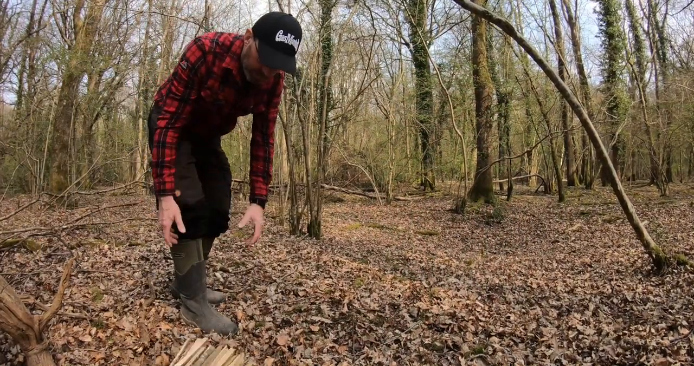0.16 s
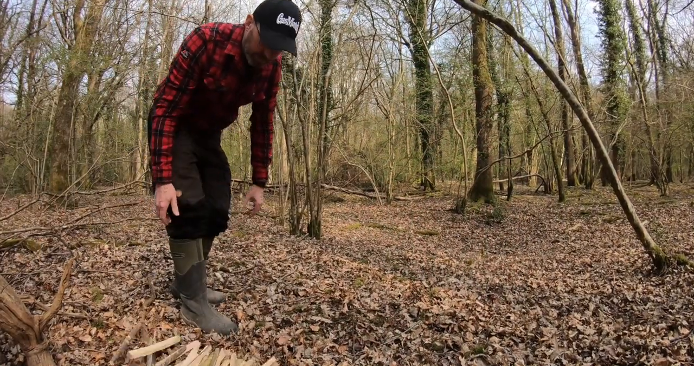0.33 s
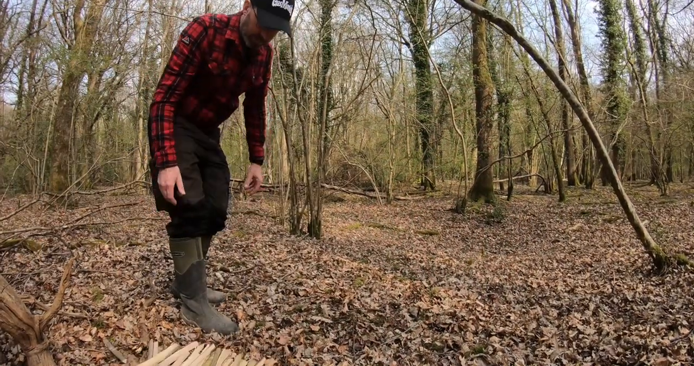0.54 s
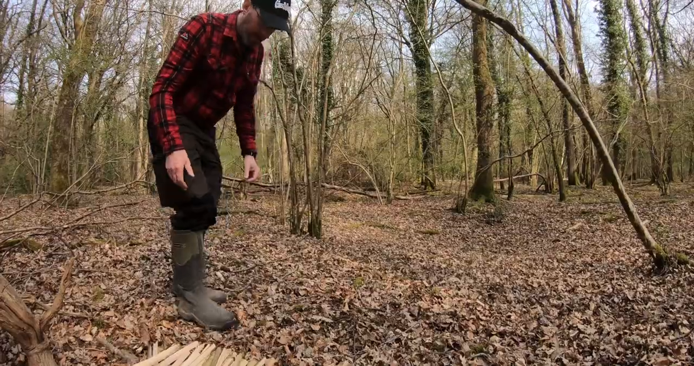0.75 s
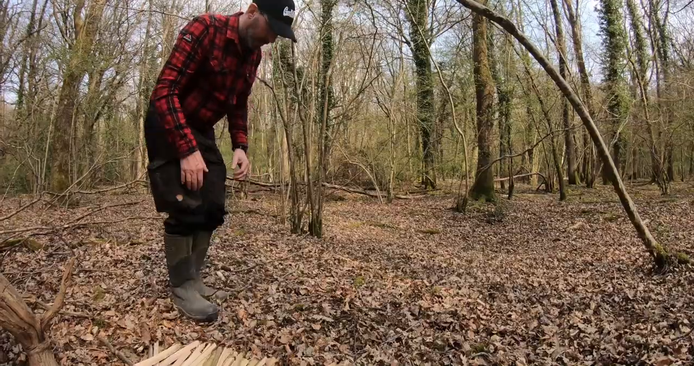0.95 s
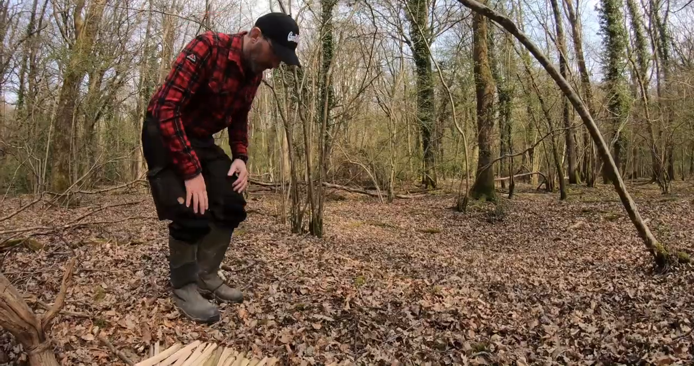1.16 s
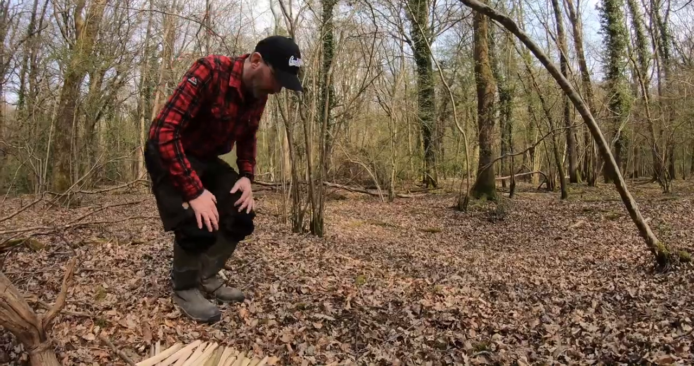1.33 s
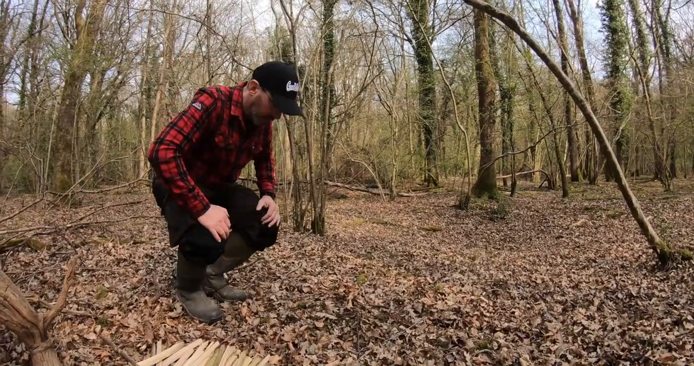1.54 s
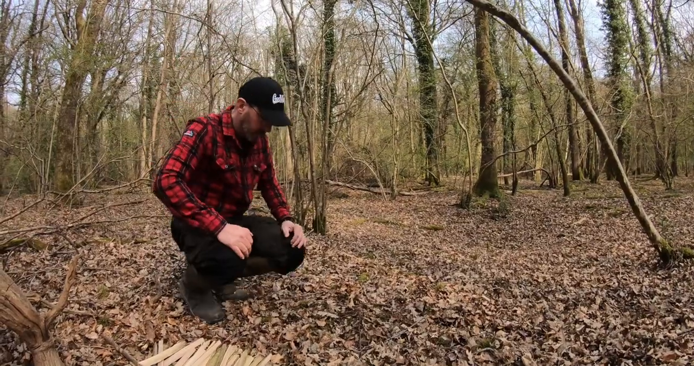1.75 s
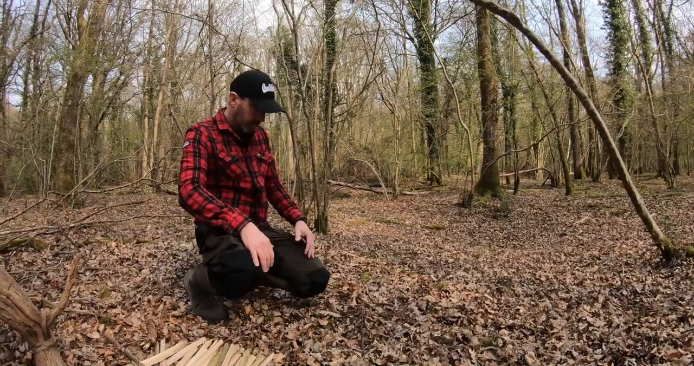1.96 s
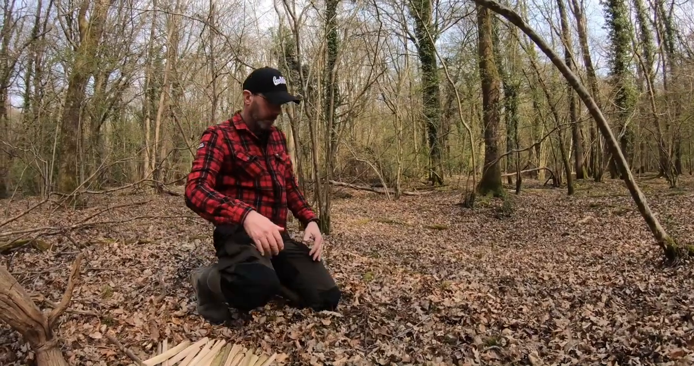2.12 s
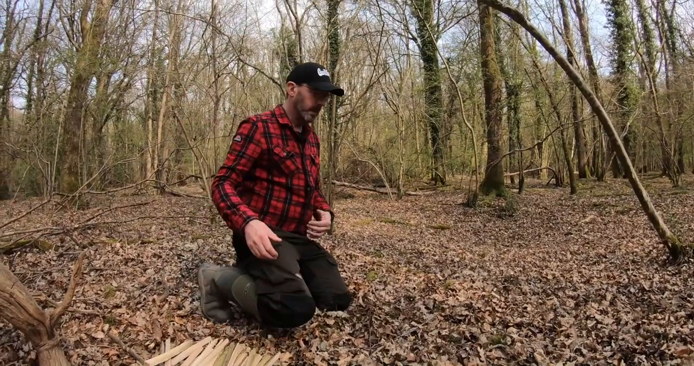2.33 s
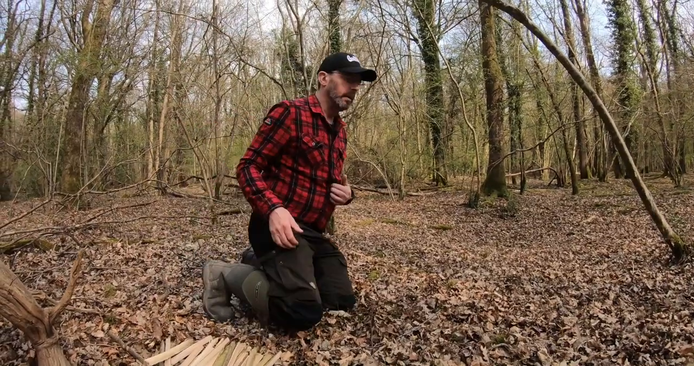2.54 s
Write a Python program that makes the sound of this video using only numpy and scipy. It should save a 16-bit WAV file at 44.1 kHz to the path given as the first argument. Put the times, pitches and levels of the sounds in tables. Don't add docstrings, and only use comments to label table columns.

```python
import sys
import numpy as np
from scipy import signal
from scipy.fft import rfft, irfft
from scipy.io import wavfile
from scipy.ndimage import uniform_filter1d

SR = 44100
rng = np.random.default_rng(int(sys.argv[2]) if len(sys.argv) > 2 else 0)


def decibels_to_gain(level_db):
    exponent = np.asarray(level_db, float) / 20
    return 10 ** exponent


def pcm_store(signal):
    levels = np.round(np.clip(np.atleast_2d(signal), -1, 1) * 32767)
    wavfile.write(sys.argv[1], SR, levels.astype(np.int16).T)


N = 114660


def evened(x):
    return x / np.sqrt(np.mean(x ** 2) + 1e-20)


def read(points, hz):
    f, value = np.transpose(points)
    return np.interp(np.log(hz + 1), np.log(f + 1), value)


def curve(points, col=1):
    rows = np.array(points)
    return np.interp(np.arange(N) / SR, rows[:, 0], rows[:, col])


def add(mix, s, sound):
    part = mix[..., round(s * SR):][..., :sound.shape[-1]]
    part += sound[..., :part.shape[-1]]


def coloured(x, points):
    z = rfft(x)
    flat = z / np.sqrt(uniform_filter1d(abs(z) ** 2, size=1500) + 1e-12)
    return evened(irfft(flat * decibels_to_gain(read(points, np.fft.rfftfreq(N, 1 / SR))), N))


def ring(hz, t60, soft, length=.15):
    t = np.arange(round(length * SR)) / SR
    return (1 - np.exp(-t / soft)) * decibels_to_gain(-60 * t / t60) * np.sin(2 * np.pi * hz * t)


def drift(per_s):
    span = round(SR / 64 / per_s)
    steps = uniform_filter1d(uniform_filter1d(rng.standard_normal(N // 64 + 2), span), size=3)
    return np.repeat(evened(steps - uniform_filter1d(steps, 4 * span)), 64)[:N]


def crackle(per_s, size_db, share, colour, count=30):
    happens = rng.random(N) < per_s / SR * decibels_to_gain(2 * drift(90))
    size = decibels_to_gain(size_db * np.minimum(rng.exponential(1, N), 4)) * happens
    kind = rng.integers(0, count, N)
    t = np.arange(900) / SR
    grains = np.zeros((2, N))
    for k, hz in enumerate(np.geomspace(500, 12000, count)):
        snap = rng.standard_normal((2, 900)) * decibels_to_gain(-60 * t / 0.0065)
        curl = 0.29 * np.sqrt(hz / 3000) * ring(hz, 35 / hz + 0.019, 0.0001, length=900 / SR)
        grains += signal.oaconvolve((size * (kind == k))[None], snap + curl * [[1], [0]], axes=1)[:, :N]
    share = np.clip(share, 0, 1)
    hiss = rng.standard_normal((2, N)) * decibels_to_gain(.6 * drift(40))
    blend = np.sqrt(share) * evened(grains) + np.sqrt(1 - share) * hiss
    return np.array([coloured(v, colour) for v in blend])


# time [s], level [dB].
LANDING = [
    (.215, -64),
    (.225, -38),
    (.234, -25),
    (.245, -18),
    (.258, -18.5),
    (.267, -25.5),
    (.277, -36),
    (.3, -43.5),
]
# frequency [Hz], density [dB per Hz].
CRUNCH = [(180, -23), (300, -22), (700, -19), (1900, -13), (3240, -5.5), (5500, -12.5), (9550, -19.5),
          (16000, -36)]
# start [s], level [dB], main ring [Hz].
KNOCKS = [(0.245, -25, 3040), (.251, -5.5, 3179), (0.2549, -12, 2210), (0.259, -25, 2900), (.28, -24, 2350),
          (0.28, -25, 4250), (.285, -38.5, 940), (0.307, -33.5, 1524), (0.303, -28, 2290),
          (.358, -29.5, 1300), (.362, -32, 2210), (.39, -36, 2160), (0.410, -28, 1594), (.4105, -25, 2240),
          (0.416, -27, 4520), (0.431, -27.5, 1640), (.445, -26, 2960), (.451, -25, 1640), (0.45, -19, 3030),
          (.448, -37, 910), (.501, -34, 1011), (.527, -40, 977), (.468, -28, 1206), (.483, -27.5, 2270),
          (.495, -35, 1033), (.575, -44, 3670)]
OVERTONE, OVERTONE_DB = 1.7, -5.5
TICK_DB, SOFT_S, KNOCK_T60, CONTACT_S = -12, 0.0003, .07, 0.0049
THUD_S, THUD_DB, THUD_HZ, THUD_T60 = .252, -34, 85, 0.16


def sticks():
    rows = [(LANDING[0][0] - .003, -90)] + list(LANDING) + [(LANDING[-1][0] + 0.025, -90)]
    out = decibels_to_gain(curve(rows)) * crackle(4000, 4.5, 0.4, CRUNCH) * [[1], [.5]]
    out[0] += rattle()
    add(out[0], THUD_S, decibels_to_gain(THUD_DB) * ring(THUD_HZ, THUD_T60, 0.0065, length=.3))
    add(out[0], THUD_S - .004, decibels_to_gain(THUD_DB) * ring(1.45 * THUD_HZ, 0.5 * THUD_T60, 0.0051, length=.3))
    add(out[0], THUD_S - .008, decibels_to_gain(-26) * ring(250, .045, .003))
    t = np.arange(600) / SR
    for s, db, hz in KNOCKS:
        t60 = KNOCK_T60 * (1500 / hz) ** .7
        tick = rng.standard_normal((2, round(.15 * SR))) * ring(4150, 0.008, 0.00026)
        contacts = (rng.random(600) < 2000 / SR) * rng.standard_normal(600)
        scrape = contacts * np.exp(-t / CONTACT_S) * .22 + (t == 0)
        wood = ring(hz, t60, SOFT_S)
        wood += 0.16 * ring(hz * 0.494, .5 * t60, SOFT_S)
        wood += decibels_to_gain(OVERTONE_DB) * ring(hz * OVERTONE, 0.28 * t60, SOFT_S)
        strike = wood * [[1], [.6]] + decibels_to_gain(TICK_DB) * tick
        add(out, s, decibels_to_gain(db - 2.5) * signal.oaconvolve(strike, scrape[None], axes=1))
    return out


WOOD = [763, 940, 1206, 1640, 1856, 2210, 2410, 2900, 3120, 3670, 4500, 5500]
RATTLE_DB, RATTLE_PER_S, RATTLE_T60, RATTLE_EASED_S = -4.5, 1200, 0.033, 0.69


def rattle():
    t, out = np.arange(N) / SR, np.zeros(N)
    size = decibels_to_gain(5.4 * np.minimum(rng.exponential(1, N), 3)) * (rng.random(N) < RATTLE_PER_S / SR)
    kind = rng.integers(0, len(WOOD), N)
    for k, hz in enumerate(WOOD):
        mode = ring(hz, RATTLE_T60 * np.sqrt(1500 / hz), 0.00027)
        out += signal.oaconvolve(size * (kind == k), mode)[:N]
    settling = np.clip((RATTLE_EASED_S - t) / 0.2, .2, 1) * (t > LANDING[0][0])
    return decibels_to_gain(RATTLE_DB + curve(STIR)) * settling * evened(out)


# time [s], level [dB], weight on them [dB].
STIR = [(0, -63, -0.5), (.2, -70, 9), (.29, -42, 2), (.34, -42, -17), (.45, -36, -3), (.56, -41, -4),
        (.63, -53, -3), (.74, -52.5, 1.5), (.93, -43, -2), (1.045, -35.5, 3), (1.085, -48.5, 2.5),
        (1.45, -55, -1.5), (1.8, -53.5, -5.5), (2.03, -50, 2), (2.2, -52.5, -29), (2.3, -45.5, -5),
        (2.42, -49, 2.5), (2.6, -51, -10)]
# start [s], fade t60 [s], level [dB].
SCUFFS = [
    (0.767, 0.34, -47),
    (1.269, 0.048, -37),
    (1.277, 0.56, -42.5),
    (1.595, 0.73, -47.5),
    (1.865, 0.45, -53),
    (2.07, 0.076, -61),
    (2.24, 0.12, -39.5),
    (2.252, 0.35, -39.5),
    (2.41, 0.08, -47),
    (2.498, 0.2, -45),
]


def stir():
    power, t = decibels_to_gain(curve(STIR)) ** 2, np.arange(SR // 2) / SR
    for s, t60, db in SCUFFS:
        add(power, s, decibels_to_gain(db - 60 * t / t60) ** 2 * np.minimum(t / 0.0054, 1))
    return np.sqrt(power)


def patchy(x):
    z = signal.stft(x, nperseg=512)[2]
    field = uniform_filter1d(rng.standard_normal(z.shape[1:]), size=3, axis=0)
    field = uniform_filter1d(field, size=4, axis=1)
    return evened(signal.istft(z * decibels_to_gain(1.8 * evened(field)), nperseg=512)[1][:, :N])


# frequency [Hz], density [dB per Hz].
LEAF = [(180, -14), (300, -2.5), (685, -7), (2040, -4.5), (4140, -2), (9600, -11), (16000, -24)]
WEIGHT_HZ, GRAINS_PER_S, SIZE_DB, CRACKLE = 1300, 1500, 4, 0.32


def leaves():
    x = patchy(crackle(GRAINS_PER_S, SIZE_DB, CRACKLE, LEAF))
    low = signal.sosfilt(signal.butter(2, WEIGHT_HZ, fs=SR, output="sos"), x)
    return stir() * (x + (decibels_to_gain(curve(STIR, col=2)) - 1) * low)


RUB_HZ = [2070, 3060, 4080]
RUB_WIDTH, RUB_DB, RUB_S = 98, -7.5, 1.895


def rub():
    t = np.arange(N) / SR
    drive = rng.standard_normal((2, N)) * decibels_to_gain(3.3 * drift(90))
    out = sum(signal.lfilter(*signal.iirpeak(hz, hz / RUB_WIDTH, SR), drive) * 2000 / hz for hz in RUB_HZ)
    return decibels_to_gain(RUB_DB) * stir() * np.clip((t - RUB_S) / 0.13, 0, 1) * evened(out)


# start [s], level [dB], crack [Hz], thump [Hz], thump [dB].
SNAPS = [(1.1712, -23, 3230, 282, -14), (1.1726, -29, 1930, 705, -9), (1.1956, -33.5, 1510, 327, 1.5),
         (1.1967, -38, 1100, 566, -2), (1.270, -25, 1390, 925, -10), (1.329, -32.5, 1400, 535, 13.5),
         (1.333, -29, 2630, 298, 1.5), (1.638, -13, 2350, 577, -8), (1.6388, -22, 1780, 284, -3.5),
         (1.6408, -28, 3020, 915, -13), (1.8571, -24.5, 2500, 695, -5.5), (1.8596, -25.5, 2400, 1190, 1.5),
         (1.861, -35.5, 2310, 285, -2)]
# start [s], level [dB], crack [Hz].
STALKS = [(0.2556, -20, 3210), (.2584, -16, 2510), (.2804, -24, 3310), (.3616, -27, 3510),
          (0.418, -28, 4410), (.4364, -31, 3010), (0.452, -23, 2610), (1.0495, -31, 3410),
          (1.1961, -39, 4210), (1.2051, -37, 2320), (1.2168, -38, 4510), (1.5441, -41, 4200),
          (1.5685, -38, 3800), (1.6047, -38, 3310), (1.6356, -35, 6010), (1.6754, -33.5, 3010),
          (1.7212, -40, 3610), (1.7278, -37.5, 2490), (1.7512, -39, 3310), (1.8576, -37, 9700),
          (1.8583, -25, 4570), (1.8951, -38, 5010), (1.9081, -38, 4500), (1.9255, -36, 7010),
          (1.9775, -41, 8000), (2.0068, -38.5, 3010), (2.0735, -32, 5010), (2.1155, -29.5, 2960),
          (2.1441, -35, 4500), (2.1805, -39, 8500), (2.2508, -34, 2030), (2.2545, -29, 3410),
          (2.2711, -32, 2210), (2.3034, -34, 3310), (2.3201, -31, 2310), (2.4131, -39, 4510),
          (2.4571, -36, 7000), (2.5131, -32, 4240), (2.5505, -35, 4010), (2.5741, -37, 6500)]
CRACK_CYCLES, THUMP_CYCLES, SPIT_T60, SPIT_DB = 3.6, 2.4, .008, -9.5


def snaps():
    out, t = np.zeros((2, N)), np.arange(round(.15 * SR)) / SR
    for s, db, hz, low_hz, low_db in SNAPS + [(*row, 300, -40) for row in STALKS]:
        spit = rng.standard_normal((2, len(t))) * decibels_to_gain(SPIT_DB - 60 * t / SPIT_T60)
        spit = signal.lfilter(*signal.butter(2, [.5 * hz, 2 * hz], "band", fs=SR), spit)
        crack = ring(hz, 2 * CRACK_CYCLES / hz, 1 / hz)
        thump = decibels_to_gain(low_db) * ring(low_hz, 2 * THUMP_CYCLES / low_hz, 0.0023)
        add(out, s, decibels_to_gain(db + 7.0) * ((crack + thump) * [[1], [.3]] + spit))
    return out


# start [s], level [dB], centre [Hz], fade t60 [s].
TEARS = [(0.411, -27, 2490, 0.035), (0.463, -34, 4800, .02), (.49, -41, 5000, .025),
         (0.54, -32, 4840, 0.027), (.555, -32.5, 6030, 0.042), (.575, -31, 5500, 0.018),
         (.594, -39.5, 6500, 0.023), (1.116, -58, 7000, 0.017), (1.304, -42, 5000, .04),
         (1.8573, -42, 9500, .016), (2.115, -40.5, 6900, 0.012), (2.2185, -34, 6200, 0.013),
         (2.221, -32.5, 4300, 0.028), (2.251, -37, 8500, .02), (2.259, -36, 4000, 0.03),
         (2.321, -38, 2940, 0.027), (2.336, -38.5, 3800, 0.026)]


def tears():
    out, t = np.zeros((2, N)), np.arange(round(0.04 * SR)) / SR
    for s, db, hz, t60 in TEARS:
        rough = rng.standard_normal((2, len(t))) * decibels_to_gain(1.9 * rng.standard_normal(len(t)))
        band = signal.lfilter(*signal.butter(2, [0.46 * hz, 1.49 * hz], "band", fs=SR), rough)
        add(out, s, decibels_to_gain(db - 60 * t / t60) * np.minimum(t / 0.00051, 1) * evened(band))
    return out


# start [s], length [s], level [dB], start pitch [Hz], end pitch [Hz].
NOTES = [
    (0.193, 0.02, -64, 3650, 3900),
    (0.201, 0.024, -55, 3930, 4000),
    (.684, 0.026, -59.5, 3850, 3850),
    (.712, 0.08, -62.5, 3780, 3860),
    (0.8, 0.054, -56.5, 3980, 3880),
]
FAR_BIRDS_DB, FAR_BIRDS_HZ, FAR_BIRDS_WIDTH = -69, 4000, 1000


def birds():
    t = np.arange(N) / SR
    pole = np.exp(-np.pi * FAR_BIRDS_WIDTH / SR)
    noise = rng.standard_normal((2, N)) + 1j * rng.standard_normal((2, N))
    blur = signal.lfilter([1], [1, -2 * pole, pole ** 2], noise)
    far = evened((blur * np.exp(2j * np.pi * FAR_BIRDS_HZ * t)).real)
    out = decibels_to_gain(FAR_BIRDS_DB + 3.7 * drift(22)) * far
    for s, length, db, a_hz, b_hz in NOTES:
        u = np.linspace(0, 1, round(length * SR))
        tone = np.sin(2 * np.pi * np.cumsum(a_hz + (b_hz - a_hz) * u) / SR)
        add(out, s, decibels_to_gain(db + 8) * np.sin(np.pi * u) ** .3 * tone * [[1], [2.0]])
    return out


# frequency [Hz], density [dB per Hz].
AIR = [(20, -4), (100, -1), (300, -7.5), (560, -26), (4000, -36), (15500, -40)]
AIR_DB = -65.5
# time [s], level [dB].
GUST = [(0, -60), (.3, -52.5), (.45, -84), (.6, -64.5), (.75, -54.5), (.9, -64), (1.1, -53), (1.4, -67.5),
        (1.7, -63.5), (2.15, -61.5), (2.28, -54.5), (2.6, -52.5)]


def air():
    def band(low_hz, high_hz):
        sos = signal.butter(2, [low_hz, high_hz], "band", fs=SR, output="sos")
        return evened(signal.sosfilt(sos, rng.standard_normal((2, N))))

    hush = np.array([coloured(v, AIR) for v in rng.standard_normal((2, N))])
    rumble = decibels_to_gain(curve(GUST) + 3.8 * drift(16)) * band(25, 120)
    roar = decibels_to_gain(-64.5 + 2.4 * drift(6.68)) * band(170, 380)
    return decibels_to_gain(AIR_DB) * hush + rumble + roar


# frequency [Hz], side over mid [dB].
APART = [(25, -11), (70, -11.5), (200, -11.5), (700, -5.5), (1290, -9.5), (2380, -9.5), (4400, -24),
         (8120, -1.5), (15000, -6.5)]
PORT_HZ, PORT_WIDTH, PORT_DB = 9500, 1200, -4.5


def scene():
    mid, other = sticks() + leaves() + rub() + snaps() + tears() + birds() + air()
    hz = np.fft.rfftfreq(N, 1 / SR)
    turn = 1j * decibels_to_gain(PORT_DB) * np.exp(-((hz - PORT_HZ) / PORT_WIDTH) ** 2)
    side = irfft(rfft(other) * decibels_to_gain(read(APART, hz)) + rfft(mid) * (turn - .05), N)
    return np.array([mid + side, mid - side])


def roll_off(x):
    return signal.sosfilt(signal.butter(12, 16490, fs=SR, output="sos"), x)


# frequency [Hz], gain [dB].
MIC = [(300, 0), (450, -6), (620, 1.5), (7000, -2), (8200, -5.5), (9600, 0), (14000, -8)]
SHELF_HZ, SHELF_DB, EDGE_HZ = 14600, -30, 16400


def record(dry):
    hz = np.fft.rfftfreq(N, 1 / SR)
    colour = decibels_to_gain(read(MIC, hz) + SHELF_DB * (hz > SHELF_HZ)) * (hz < EDGE_HZ)
    mix = irfft(rfft(dry) * colour, N)
    return roll_off(mix)


dry = scene()
out = record(dry)
pcm_store(out)
```